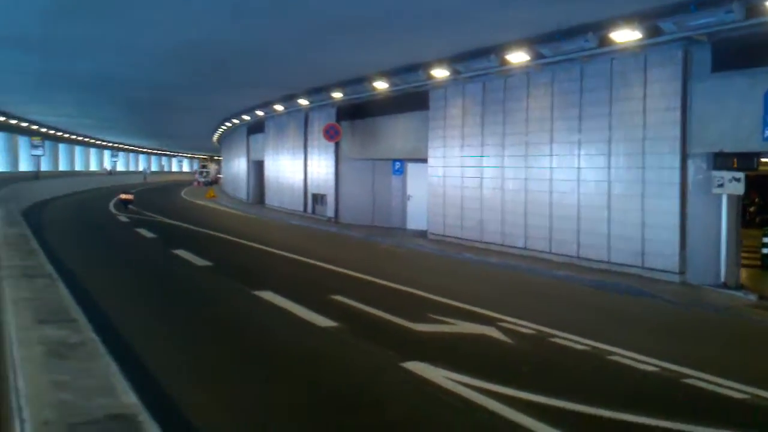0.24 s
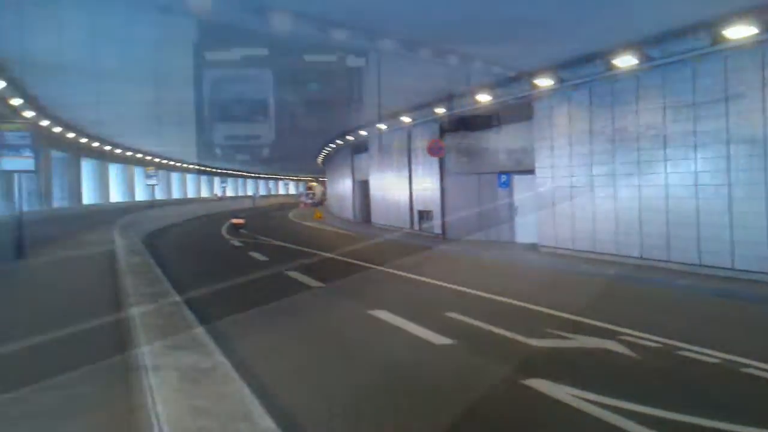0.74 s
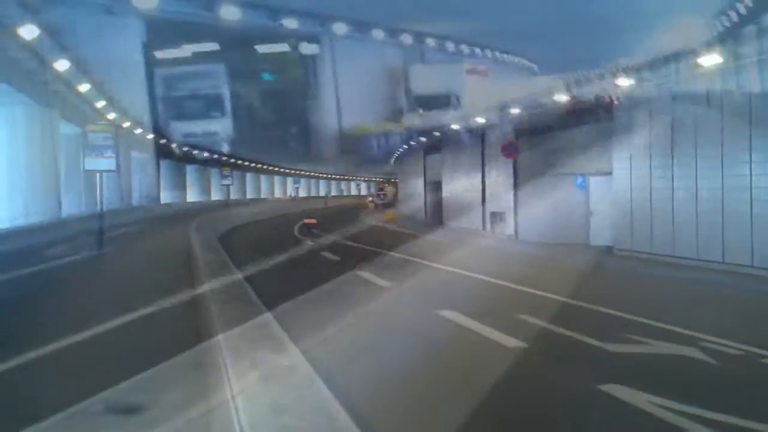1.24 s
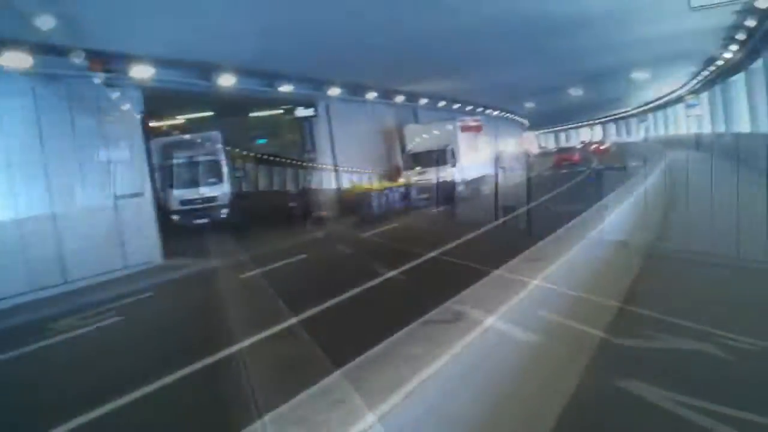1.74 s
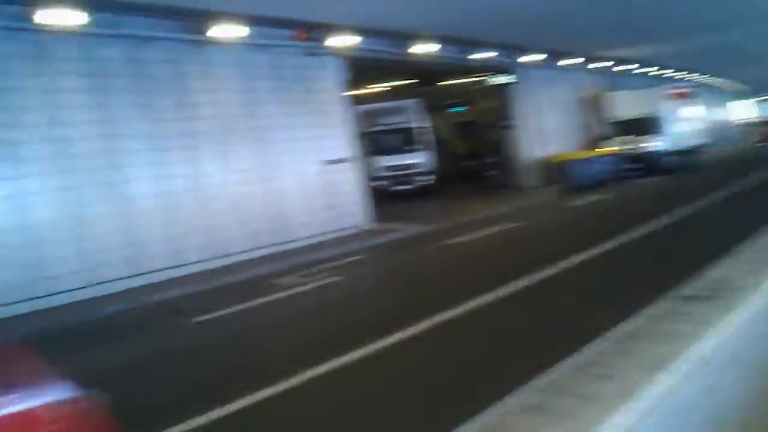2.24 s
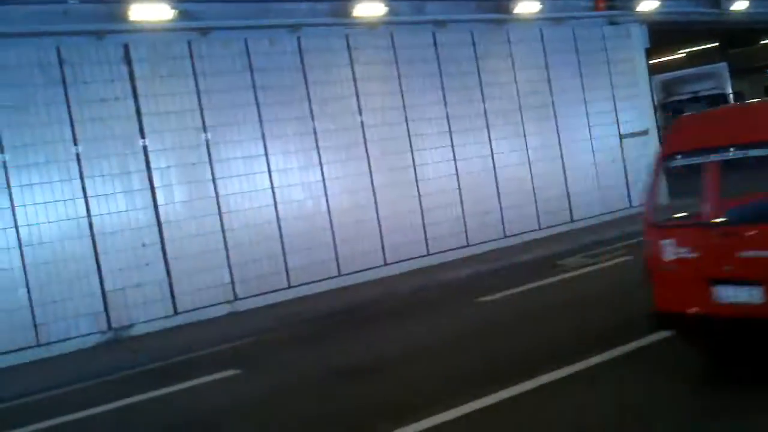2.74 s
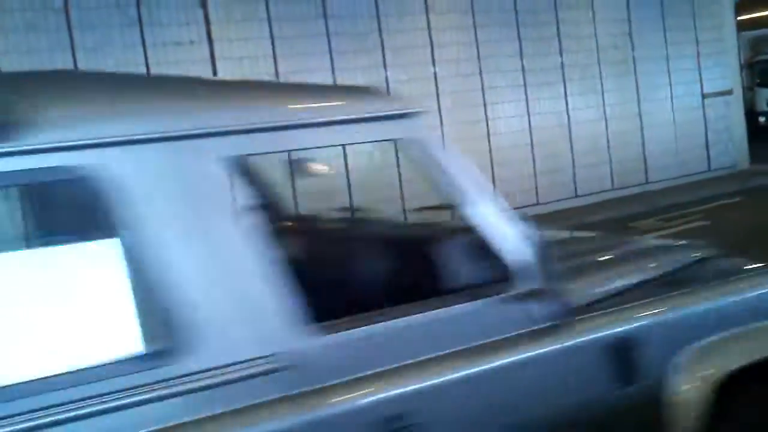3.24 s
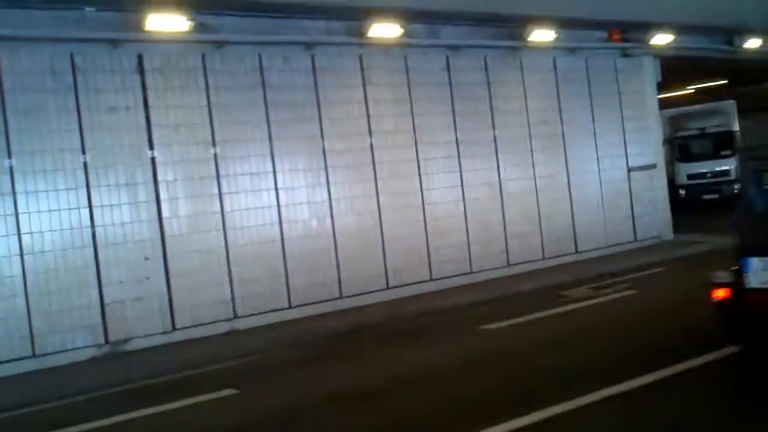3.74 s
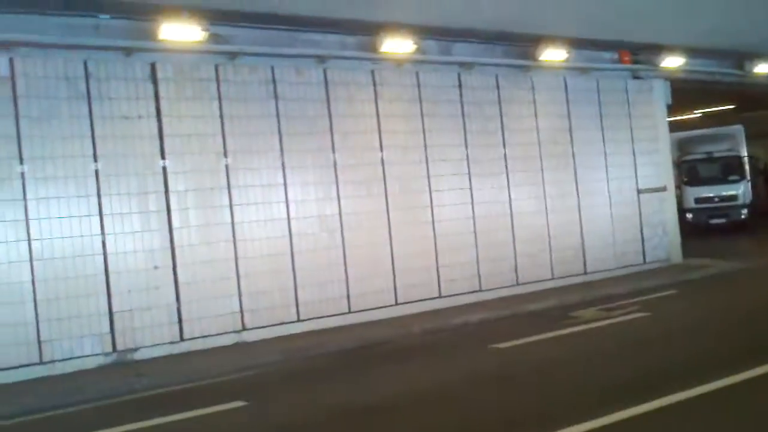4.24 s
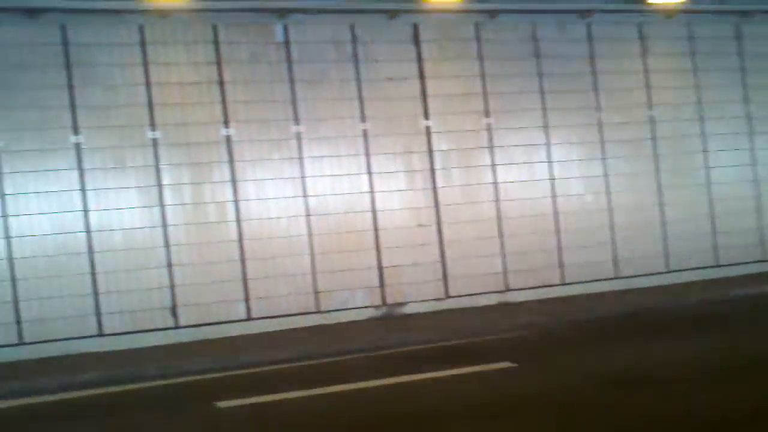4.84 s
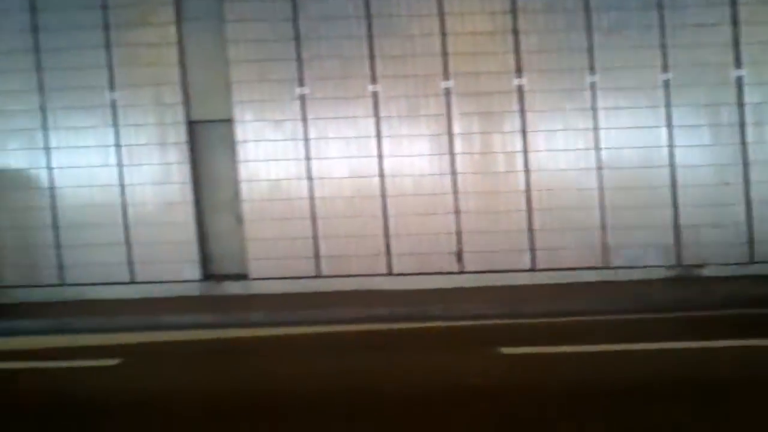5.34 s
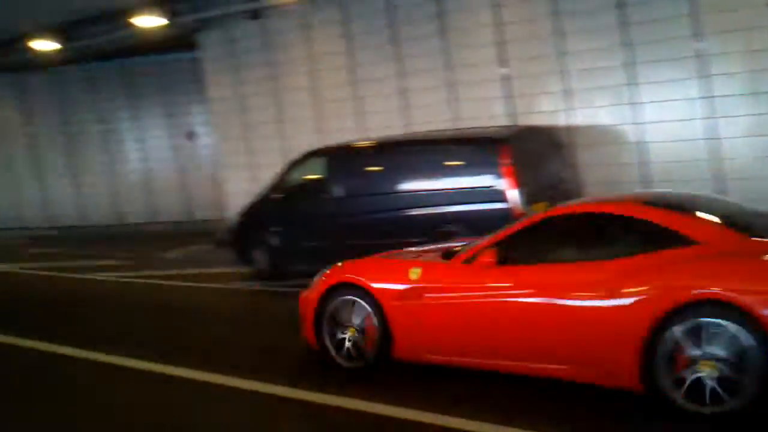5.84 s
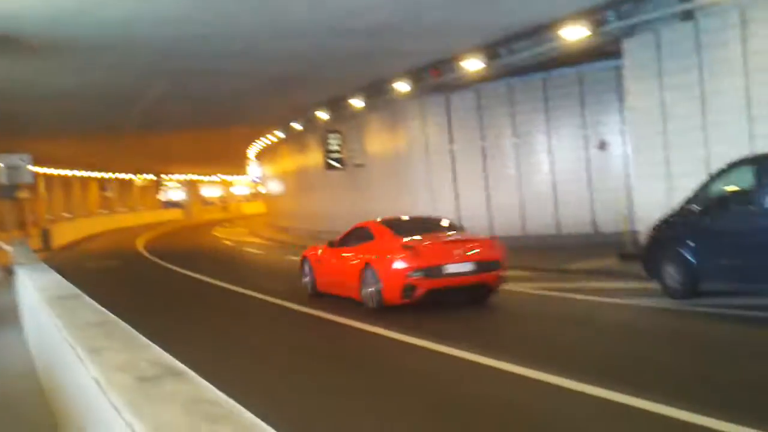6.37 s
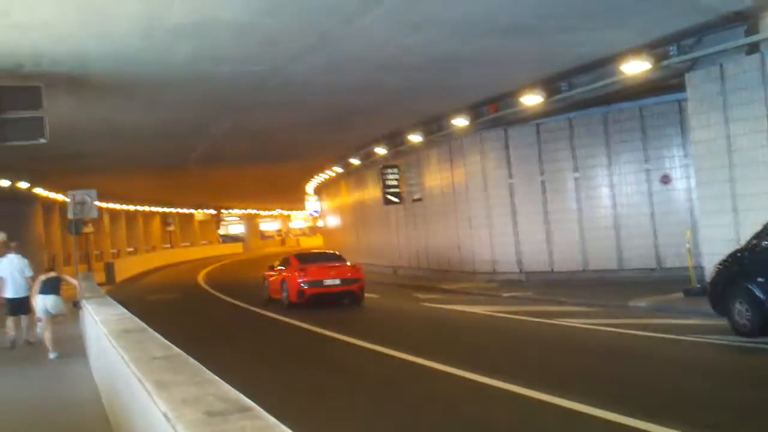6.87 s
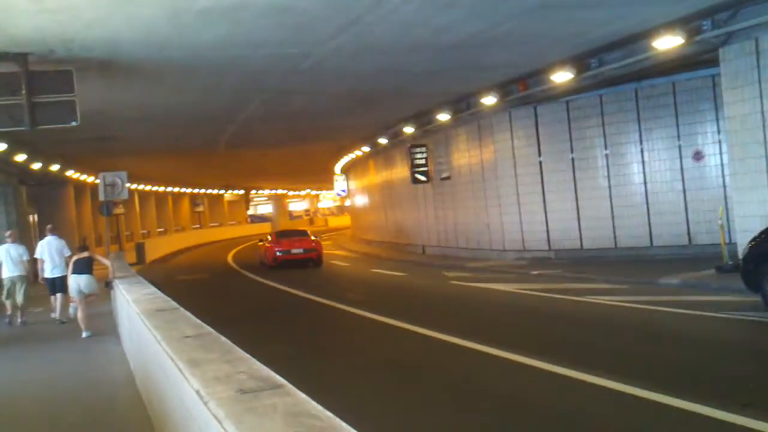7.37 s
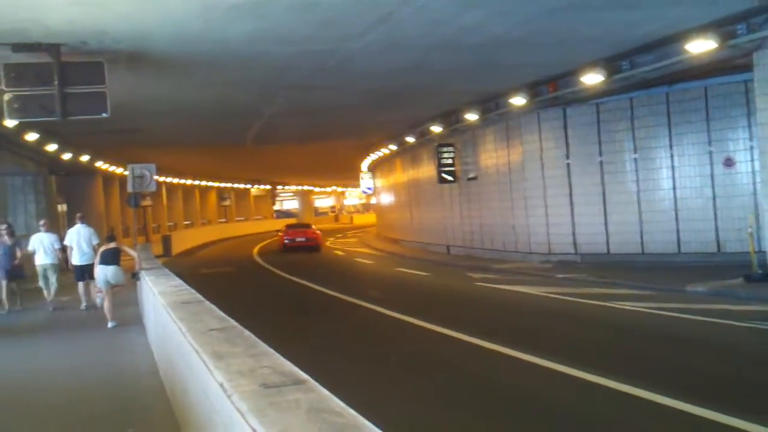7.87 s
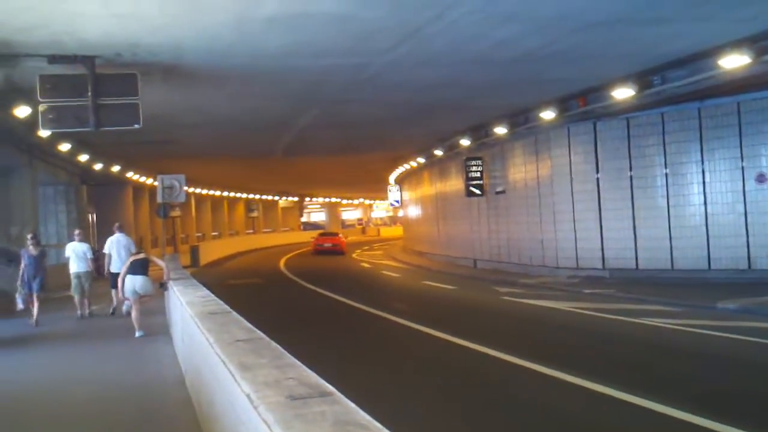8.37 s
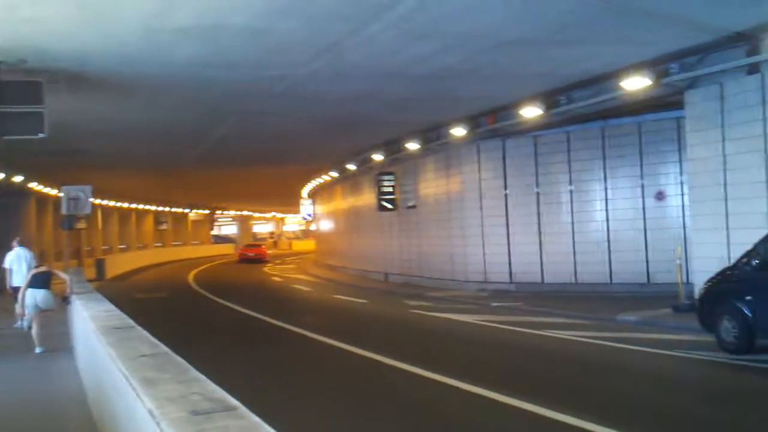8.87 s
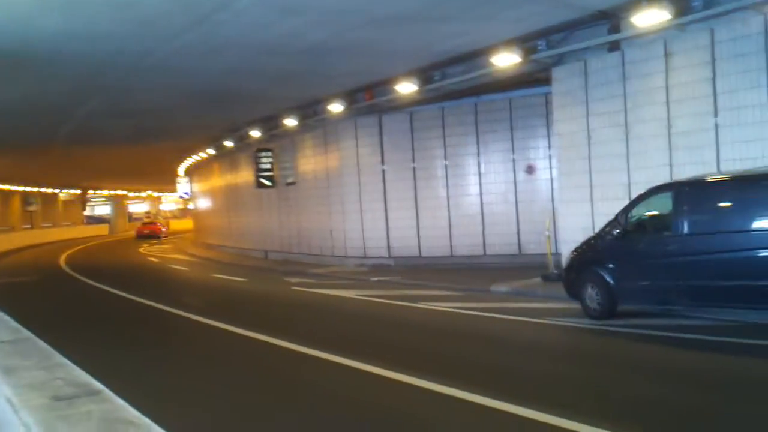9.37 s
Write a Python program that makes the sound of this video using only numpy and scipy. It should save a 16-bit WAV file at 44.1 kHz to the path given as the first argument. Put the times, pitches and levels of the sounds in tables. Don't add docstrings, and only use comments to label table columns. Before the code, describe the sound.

Vehicles rumble past in a tiled tunnel; a sports car's wavering engine howl rises, cracks at a gear change, and fades reverberantly.

```python
import sys
import numpy as np
from scipy import signal
from scipy.fft import rfft, irfft, next_fast_len
from scipy.io import wavfile
from scipy.ndimage import uniform_filter1d

SR = 44100
rng = np.random.default_rng(int(sys.argv[2]) if len(sys.argv) > 2 else 0)


def invert_db(x):
    u = np.asarray(x, float) / 20
    return 10 ** u


def generate_wav(sig):
    pcm = np.round(np.clip(np.atleast_2d(sig).T, -1, 1) * 32767).astype(np.int16)
    wavfile.write(sys.argv[1], SR, pcm)


N = 423799


def read(points, hz):
    f, value = np.transpose(points)
    return np.interp(np.log(hz + 1), np.log(f + 1), value)


def curves(rows, t):
    s, *columns = np.transpose(rows)
    return [np.interp(t, s, c) for c in columns]


def evened(x):
    return x / np.sqrt(np.mean(abs(x) ** 2) + 1e-20)


def noise(colour, patchy_db, flicker_db):
    frames, hz = N // 256 + 5, np.fft.rfftfreq(1024, 1 / SR)
    a, b, c, d, patches = rng.standard_normal((frames, 513, 5)).T
    patches = uniform_filter1d(patches, size=10, axis=0)
    patches = evened(uniform_filter1d(patches, size=12, axis=1))
    flicker = evened(uniform_filter1d(rng.standard_normal(frames), size=10))
    level_db = read(colour, hz)[:, None] + patchy_db * patches + flicker_db * flicker
    z = np.array([a + 1j * b, c + 1j * d]) * invert_db(level_db)
    return evened(signal.istft(z, nperseg=1024, noverlap=768)[1][:, :N])


def wander(n, width_hz):
    hop = 64
    steps = n // hop + 2
    z = rng.standard_normal((steps, 2)) + 1j * rng.standard_normal((steps, 2))
    r = np.exp(-np.pi * width_hz * hop / SR)
    z = evened(signal.lfilter([1], [1, -2 * r, r * r], z, axis=0))
    return np.repeat(z, hop, axis=0)[:n].T


def line(turns, width_hz, direct):
    direct = np.clip(direct, 0, 1)
    middle = np.array([[1], [0]])
    field = wander(len(turns), width_hz) * np.sqrt(1 - middle * direct ** 2) + middle * direct
    field = uniform_filter1d(field.real, size=64) + 1j * uniform_filter1d(field.imag, size=64)
    return np.sqrt(2) * (field * np.exp(2j * np.pi * turns)).real


def span(rows):
    first, last = round(rows[0][0] * SR), round(rows[-1][0] * SR)
    t = np.arange(first, min(last, N)) / SR
    to_edge = np.minimum(t - t[0] + 0.0013, t[-1] - t + 0.0026)
    return first, t, np.minimum(1, to_edge / 0.0063)


def add(mix, at, sound):
    part = mix[:, at:at + sound.shape[1]]
    part += sound[:, :part.shape[1]]


def engine(rows, orders, smear, direct):
    at, t, fade = span(rows)
    hz, db = curves(rows, t)
    turns = np.cumsum(hz) / SR
    lines = sum(invert_db(g) * line(k * turns, smear * k * hz.mean(), direct) for k, g in orders)
    return at, invert_db(db) * fade * lines


# f/Hz, density/dB per Hz
RUMBLE_COLOUR = [(30, -50.5), (70, -18.5), (110, 3), (200, 2.5), (330, 11.5), (520, -2.5), (900, -37.5)]
ROAR_COLOUR = [(300, -21), (520, 0), (800, 0), (1300, -5.5), (2000, -9), (3000, -15), (4300, -30),
               (6000, -48)]
HISS_COLOUR = [(1800, 2.5), (3000, 8), (4300, 1), (5150, 1), (5700, -1), (6500, 1), (8200, 2), (9600, -1.5),
               (10400, 3.5), (11000, 1.5)]
SWELL_COLOUR = [(15, -37), (35, -27.5), (60, -13), (85, 17.5), (130, -9)]
# nearest t/s, reach/s, rumble level/dB, roar level/dB, hiss level/dB
PASSES = [
    (0.15, 0.45, -29.5, -32, -45.5),
    (0.7, 0.49, -39.5, -35, -45.5),
    (2.42, 0.45, -24, -35, -40),
    (3.2, 0.4, -33, -41.5, -45),
    (3.85, 0.42, -29.5, -36.5, -45),
    (4.45, 0.46, -27, -33.5, -45),
    (5.2, 0.68, -41, -35, -66),
    (6.2, 1, -33.5, -48, -73),
    (8.7, 1, -38.5, -39.5, -59),
    (9.7, 1, -34.5, -36.5, -54.5),
]


def road():
    t = np.arange(0, N + 64, 64) / SR
    s, reach, *levels_db = np.transpose(PASSES)[:, :, None]
    far = 1 + ((t - s) / reach) ** 2
    fall_powers = 1.63, 1.287, 1.64
    near = [np.sqrt((invert_db(db) ** 2 / far ** fall).sum(0)) for db, fall in zip(levels_db, fall_powers)]
    low, middle, high = (np.interp(np.arange(N) / SR, t, gain) for gain in near)
    rumble = low * noise(RUMBLE_COLOUR, 0.42, 0.38)
    roar = invert_db(2.0) * middle * noise(ROAR_COLOUR, 0.77, 0.52)
    hiss = invert_db(7.0) * high * noise(HISS_COLOUR, 0.94, 0.45)
    swell = invert_db(-35) * low * noise(SWELL_COLOUR, 2.2, 3.5)
    return rumble + roar + hiss + swell


# t/s, shaft f/Hz, level/dB
LEAVING = [(0, 102.4, -23.5), (.09, 102.6, -28), (.125, 103.7, -32), (.19, 103.7, -23), (.265, 105.8, -31),
           (.34, 106.3, -26), (.44, 106, -27), (.6, 106.5, -44), (.9, 104.1, -47)]
# order/multiple, level/dB
LEAVING_ORDERS = [(1, -21.5), (2, -14.5), (3, 1.5), (5, -20)]


def leaving_car():
    return engine(LEAVING, LEAVING_ORDERS, 0.076, 0.74)


# t/s, f/Hz, level/dB
DISTANT = [(1.1, 255, -68), (1.35, 256, -36), (1.7, 248, -33.5), (2.0, 239.5, -32.5), (2.2, 239, -50)]


def distant_engine():
    return engine(DISTANT, [(0.99, .1)], 0.032, 0.99)


# t/s, shaft f/Hz, level/dB
VAN = [(1.2, 31.9, -50), (1.7, 35.03, -39), (2.0, 37.61, -33), (2.3, 41.26, -29.5), (2.55, 42.45, -30),
       (2.72, 43.68, -31), (2.78, 42.9, -42), (3.2, 41.63, -37.5)]
# order/multiple, level/dB
VAN_ORDERS = [(3, -3.5), (4, -3.5), (5, -3), (6, -6), (7, 0), (8, -4), (9, -19), (10, -10.5)]


def van():
    return engine(VAN, VAN_ORDERS, 0.064, 0.2)


# t/s, level/dB, f/Hz
PUFFS = [
    (1.5, -37, 105),
    (2.38, -33, 45),
    (2.7, -36, 60.16),
    (2.911, -37, 55.05),
    (4.52, -35, 50),
    (6.571, -53, 50),
]


def puffs():
    out = np.zeros((2, N))
    for s, db, hz in PUFFS:
        u = np.linspace(-3, 3, round(2.2 * SR / hz))
        pressure = u * np.exp(-u * u) * 2
        add(out, round(s * SR) - len(u) // 2, invert_db(db) * np.outer([1, .6], pressure))
    return out


# t/s, length/s, f/Hz, level/dB
SWELLS = [(2.222, 0.18, 116, -35.5), (2.531, .12, 124, -28), (2.668, 0.14, 123.5, -30),
          (2.418, 0.087, 229, -28.5), (2.59, 0.19, 208, -28), (2.802, 0.15, 215, -29.5),
          (2.918, 0.11, 211, -29.5), (2.171, 0.057, 313, -24), (2.302, 0.12, 348, -24.5),
          (2.385, 0.058, 342, -22), (2.461, .04, 293, -23), (2.531, 0.11, 302, -24),
          (2.667, 0.12, 352.7, -21.5), (2.72, .045, 274, -19.5)]


def van_swells():
    out = np.zeros((2, N))
    for s, length, hz, db in SWELLS:
        t = np.arange(-length / 2, length / 2, 1 / SR)
        lump = invert_db(db) * np.cos(np.pi * t / length) * line(hz * t, 8, 0.89)
        add(out, round((s - length / 2) * SR), lump)
    return out


# t/s, shaft f/Hz, level/dB
OFFROAD = [(2.8, 32.5, -36), (3.2, 30.9, -41), (3.6, 29.86, -34.5), (4.0, 29.5, -38), (4.3, 30.5, -34),
           (4.6, 30.4, -32), (4.9, 30.37, -37), (5.3, 30.49, -36)]
# order/multiple, level/dB
OFFROAD_ORDERS = [(4, -8.5), (5, -5), (6, -5.5), (7, 3), (8, 3), (10, -14.5), (12, -6.5)]


def offroad_car():
    return engine(OFFROAD, OFFROAD_ORDERS, 0.06, 0.61)


# t/s, f/Hz, level/dB
HUM = [(2.85, 95.1, -39), (3.0, 91, -39), (3.5, 90.7, -40), (4.05, 89.7, -39), (4.15, 90, -52),
       (4.45, 90.6, -44), (4.57, 90.2, -37.5), (4.8, 89.4, -36.5), (5.0, 87, -45.5), (5.2, 87.7, -47.5),
       (5.3, 85.6, -47), (5.5, 85, -49), (5.7, 85, -50)]


def hum():
    return engine(HUM, [(1, .1)], 0.042, 0.92)


# t/s, firing f/Hz, throttle level/dB, uneven firing level/dB
DRIVE = [(4.3, 202, -40, -54), (4.6, 211.8, -33.5, -47), (4.9, 224.9, -42, -33.5), (5.3, 235.6, -29, -39),
         (5.45, 240, -25, -35), (5.6, 242.6, -32, -32), (5.75, 244.7, -28, -31), (5.9, 245, -29, -32.5),
         (6.02, 244.3, -30.5, -37), (6.09, 239, -28, -43), (6.2, 236.9, -32.5, -46.5),
         (6.7, 232.7, -33.5, -46), (7.5, 230.4, -40, -47.5), (7.9, 233.6, -30, -47.5),
         (8.4, 237.6, -30, -48), (8.95, 240.8, -30, -42), (9.2, 243.2, -33.5, -37), (9.61, 247, -37.5, -37)]
# t/s, length/s, level/dB
BEATS = [(4.425, 0.02, -27), (4.456, 0.024, -31), (4.481, 0.029, -32), (4.568, 0.048, -22.5),
         (4.69, 0.072, -24.5), (4.782, 0.074, -20), (4.884, 0.13, -24.5), (4.95, 0.07, -17),
         (5.015, 0.12, -20.5), (5.125, 0.07, -15), (5.177, 0.044, -29), (5.215, 0.051, -23.5),
         (5.297, 0.051, -17.5), (5.391, 0.14, -14.5), (5.5, 0.14, -21), (5.56, 0.056, -13.5),
         (5.668, 0.045, -22), (5.747, 0.076, -15.5), (5.957, 0.23, -14), (6.073, 0.063, -22),
         (6.144, 0.046, -21.5), (6.281, 0.15, -19), (6.393, 0.079, -22.5), (6.524, 0.108, -21.5),
         (6.607, 0.035, -24.5), (6.642, 0.044, -32.5), (6.71, 0.051, -24.5), (6.797, 0.035, -35),
         (6.862, 0.039, -23.5), (6.956, 0.041, -24), (7.044, 0.046, -22), (7.144, 0.048, -31),
         (7.232, 0.035, -25), (7.295, 0.084, -30.5), (7.387, 0.085, -24.5), (7.566, 0.035, -28.5),
         (7.603, 0.027, -31), (7.696, 0.031, -25.5), (7.753, 0.04, -28.5), (7.839, 0.12, -23),
         (7.964, 0.071, -27.5), (8.029, 0.037, -26.5), (8.1, 0.102, -21.5), (8.255, 0.06, -19),
         (8.337, 0.078, -20.5), (8.526, 0.13, -18), (8.628, 0.051, -26.5), (8.697, 0.06, -19),
         (8.864, 0.078, -22), (8.922, 0.038, -22), (8.967, 0.041, -23.5), (9.052, 0.041, -20.5),
         (9.116, 0.08, -29), (9.177, 0.039, -23.5), (9.33, 0.062, -16), (9.505, 0.11, -20),
         (8.44, 0.13, -20.5), (8.79, 0.12, -22), (9.6, 0.094, -19)]
# order/multiple, near level/dB, far level/dB
OVERTONES = [(2, 1, -3.5, ), (3, -5, -1.5), (4, -11.5, -19), (5, -18.5, -6.5), (6, -49, -26.5),
             (7, -37, -14)]
# order/multiple, level/dB
HALVES = [(.5, -3), (1.25, -14), (1.5, -6.5), (1.75, -13.5), (2.251, -17), (2.5, -1), (2.75, -7),
          (3.25, -9.5), (3.5, -3.5), (3.75, -9.5), (4.5, -12)]


def sports_car():
    at, t, fade = span(DRIVE)
    hz, over_db, uneven_db = curves(DRIVE, t)
    turns = np.cumsum(hz) / SR
    turn_away_s, recede_s = 5.6, 0.99
    far = 1 - np.exp(-np.maximum(t - turn_away_s, 0) / recede_s)
    overlap, smear_hz = 1.3, 22
    beats = np.zeros(len(t))
    for k, (s, length, db) in enumerate(sorted(BEATS)):
        arch = np.cos(np.pi * np.clip((t - s) / (overlap * length), -.5, .5))
        beats += (-1) ** k * invert_db(db) * arch
    between = invert_db(over_db + 2) * line(turns + 0.26, smear_hz, .8)
    note = beats * line(turns, smear_hz, .96) + between
    direct = .6 + far * (.4 - .6)
    over = sum(invert_db(over_db + a + far * (b - a)) * line(k * turns, 17 * k, direct) for k, a, b in OVERTONES)
    halves = sum(invert_db(uneven_db + g) * line(k * turns, 10 * k, 1.08 - 0.26 * k) for k, g in HALVES)
    return at, fade * (note + over + halves)


# t/s, peak level/dB, f/Hz
THUMPS = [
    (5.609, -20, 900),
    (6.573, -17, 260),
    (6.605, -16, 330),
    (6.709, -15, 230),
    (6.717, -18, 900),
    (6.737, -15, 240),
    (9.58, -20, 750),
]


def thumps():
    out = np.zeros((2, N))
    for s, db, hz in THUMPS:
        u = np.arange(-1.5, 1.5, hz / SR)
        blow = np.cos(2 * np.pi * u) * np.exp(-2 * u * u)
        add(out, round((s - 1.5 / hz) * SR), -invert_db(db) * np.outer([1, .3], blow))
    return out


# t/s, level/dB, t60/s
POPS = [
    (6.549, -19.5, 0.29),
    (6.562, -19, 0.26),
    (6.575, -19.5, 0.27),
    (6.592, -23, 0.4),
    (6.603, -24, .5),
    (6.65, -27.5, 0.46),
    (6.7, -23.5, 0.47),
    (6.715, -21.5, 0.27),
    (6.737, -23.5, 0.73),
    (6.793, -26, 0.56),
]
# f/Hz, density/dB per Hz
POP_COLOUR = [(40, -43), (150, 1.5), (350, 4.5), (800, 4), (1400, -4.5), (2200, -9.5), (4000, -29.5),
              (6000, -41)]


def pops():
    t, power = np.arange(N) / SR, np.zeros(N)
    for s, db, t60 in POPS:
        u = np.maximum(t - s, 0)
        crack = invert_db(db - 60 * u / (0.047 * t60))
        tail = invert_db(db - 7.0 - 60 * u / t60)
        power += (crack + tail) ** 2 * np.minimum(u / 0.0052, 1)
    return np.sqrt(power) * noise(POP_COLOUR, 0.56, 0.54)


# t/s, f/Hz, level/dB
DRONE = [(7.25, 86.3, -53), (7.5, 89.8, -51), (8.15, 90.4, -45.5), (8.35, 89.5, -67)]


def drone():
    return engine(DRONE, [(0.99, .1)], 0.03, 1.0)


# t/s, left-right level/dB
SWING = [(0, 4.5), (.4, 5), (.6, -0.5), (1.2, 1), (2.1, 5), (3.2, 4.5), (4.0, -2.5), (5.7, -6), (6.5, 0),
         (7.7, 1), (8.8, 2.5), (9.61, 3)]


def swung(mix):
    lean = np.tanh(curves(SWING, np.arange(N) / SR)[0] * 0.11)
    low = signal.filtfilt(*signal.butter(1, 1600, fs=SR), mix)
    side = mix[1] + (np.sqrt(1 - lean ** 2) - 1) * low[1] + lean * low[0]
    return np.array([mix[0] + side, mix[0] - side])


def scene():
    mix = road() + puffs() + van_swells() + thumps() + pops()
    for source in (leaving_car, distant_engine, van, offroad_car, hum, sports_car, drone):
        add(mix, *source())
    return swung(mix)


# f/Hz, share cancelled in the middle
CROSS = [(700, 0.046), (1500, 0.85), (2300, 0.63), (2900, 0.89), (5200, 0.11), (7800, 0.094), (10400, 0.26)]
# f/Hz, side against mid level/dB
WIDTH = [(60, -6), (250, -6.5), (700, -7), (1500, 1), (2600, -2), (4500, -0.5), (6000, -1), (6900, 2),
         (8500, 0), (10000, -3.5)]
# f/Hz, share left in the side nulls
SIDE_FILL = [(1300, 0.051), (3900, 0.35), (6500, .4), (9000, 0.22)]
# f/Hz, quarter-turned middle leaking into the side
TURN = [(150, 0), (500, -.07), (1300, 0), (1750, -.13), (2300, -.45), (2600, 0), (2850, .18), (3300, 0)]


def cross_feed(dry):
    delay_s = 17 / SR
    size = next_fast_len(N + 4096)
    hz = np.fft.rfftfreq(size, 1 / SR)
    late, share = np.exp(-2j * np.pi * hz * delay_s), np.clip(read(CROSS, hz), 0, 1)
    comb = (1 - share * late) / (1 + share)
    side_comb = np.cos(np.pi * hz * delay_s) + 1j * read(SIDE_FILL, hz)
    wide = side_comb * invert_db(read(WIDTH, hz)) * comb / (abs(comb) + 1e-9)
    mid = irfft(rfft(dry[0] + dry[1], size) * comb / 2, size)[:N]
    leak = 1j * read(TURN, hz) * rfft(mid, size)
    side = irfft(rfft(dry[0] - dry[1], size) * wide / 2 + leak, size)[:N]
    return np.array([mid, side])


# f/Hz, threshold level/dB against the level around
GATE = [(150, -60), (600, -32), (1300, -14), (2600, -5), (3300, -8), (4500, -5), (4900, 1), (5500, 1.5),
        (6000, -7), (7100, -7), (7800, -2.5), (8500, -8), (9500, -6), (10100, 3), (11000, 5)]
# f/Hz, extra side threshold level/dB
SIDE_STRICTER = [(2600, -3), (3300, 2), (3800, 8), (4400, 4), (5200, 1), (5800, 9), (6300, 11), (6900, 6),
                 (7800, 2.5), (8500, 7), (9300, 8), (10300, -1)]


def gated(pair):
    size, hop, lead, waver_db = 2048, 1024, 689, 3.2
    window = np.sqrt(signal.get_window("hann", size))
    hz, _, z = signal.stft(np.pad(pair, [(0, 0), (lead, 0)]), SR, window, size, hop)
    power = abs(z) ** 2
    around = uniform_filter1d(power.sum(0), size=40, axis=0)
    around = uniform_filter1d(around, size=3, axis=1)
    waver = evened(uniform_filter1d(rng.standard_normal(around.shape), size=14, axis=0))
    floor = around * invert_db(read(GATE, hz)[:, None] + waver_db * waver) ** 2
    floor = np.array([floor, floor * invert_db(read(SIDE_STRICTER, hz)[:, None]) ** 2])
    return signal.istft(z * (power > floor), SR, window, size, hop)[1][:, lead:lead + N]


def band_limit(x):
    return signal.sosfilt(signal.butter(12, 11010, fs=SR, output="sos"), x)


def record(dry):
    mid, side = gated(cross_feed(dry))
    return band_limit(np.array([mid + side, mid - side]))


dry = scene()
out = record(dry)
generate_wav(out)
```